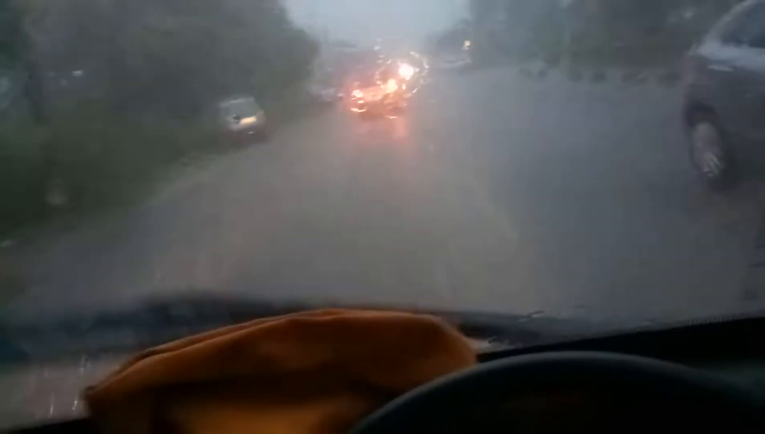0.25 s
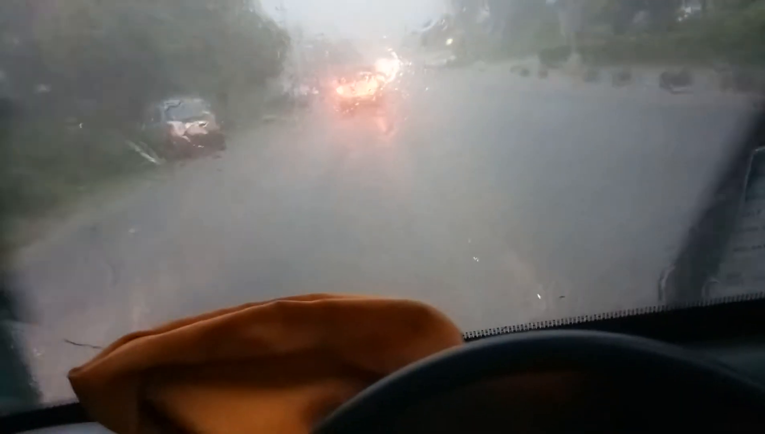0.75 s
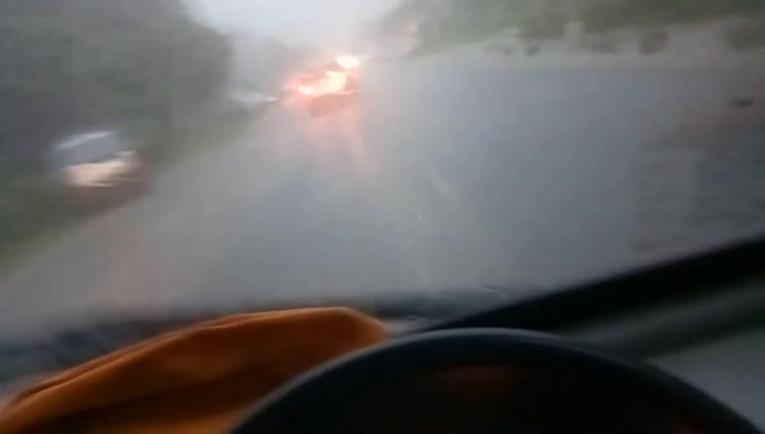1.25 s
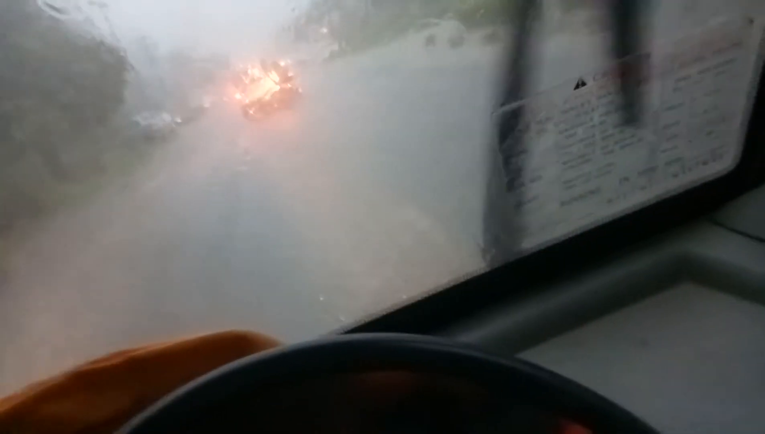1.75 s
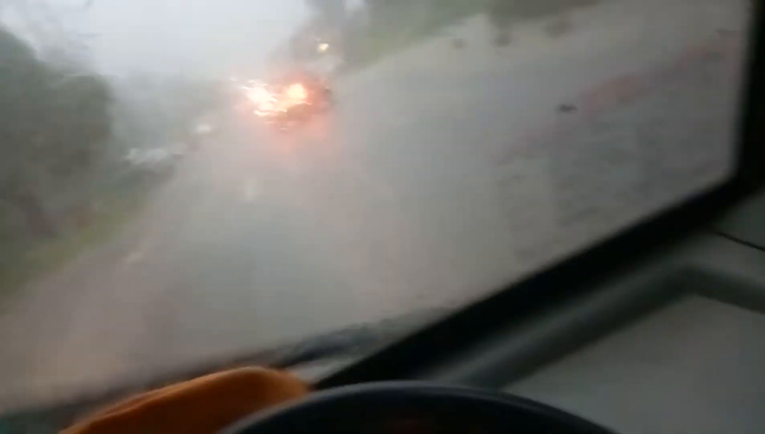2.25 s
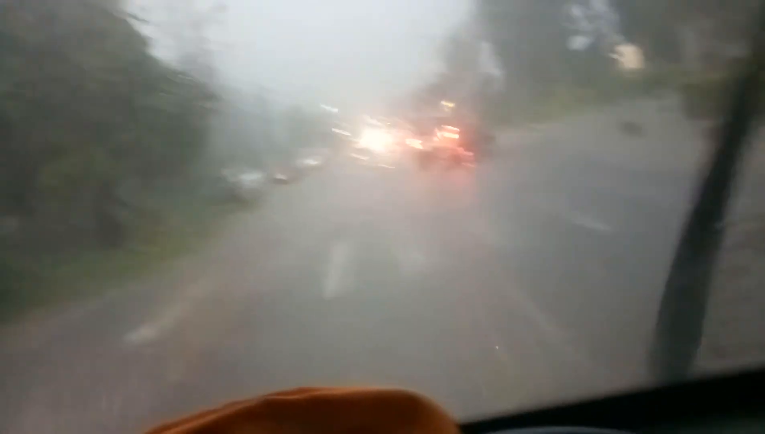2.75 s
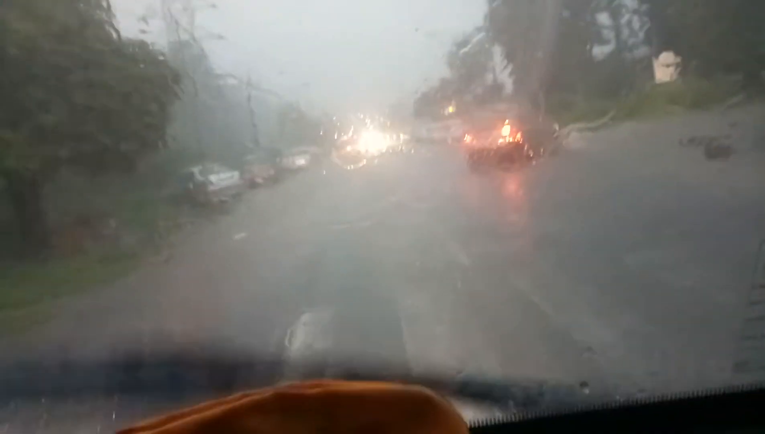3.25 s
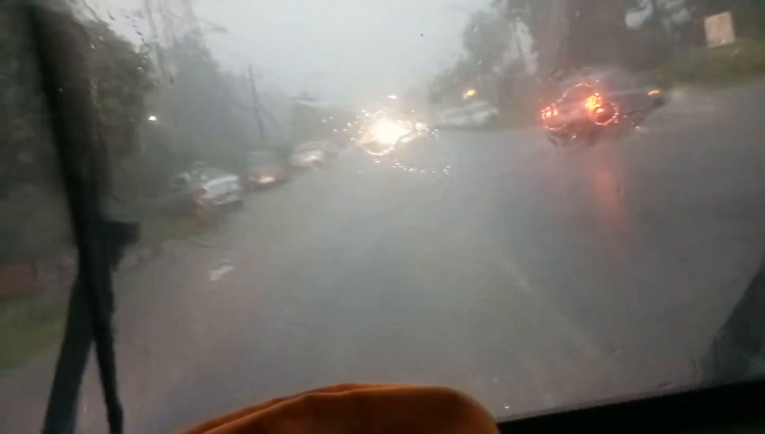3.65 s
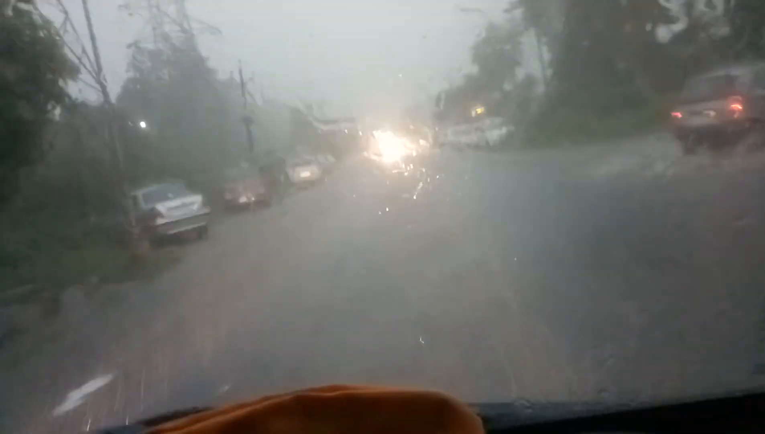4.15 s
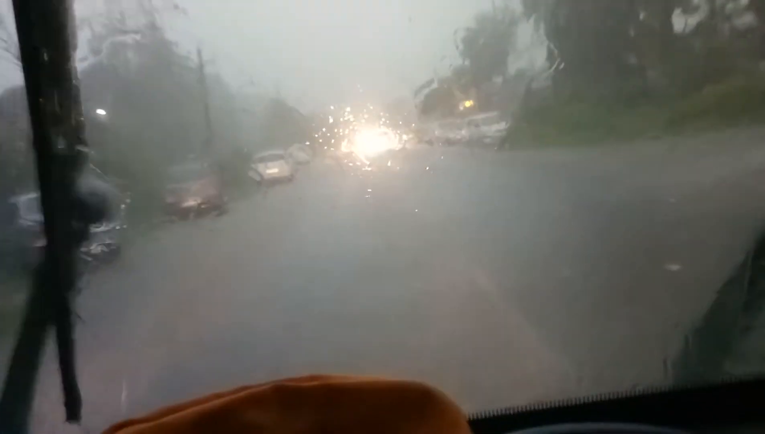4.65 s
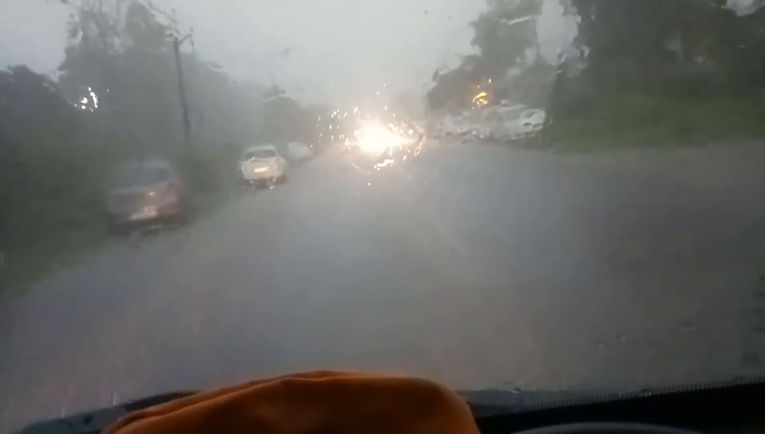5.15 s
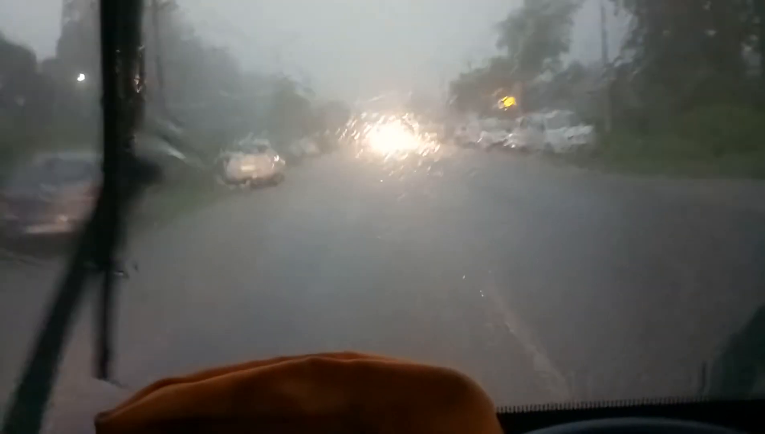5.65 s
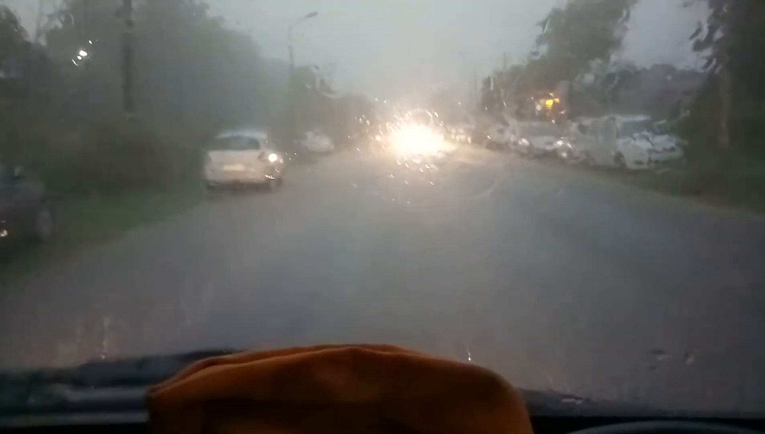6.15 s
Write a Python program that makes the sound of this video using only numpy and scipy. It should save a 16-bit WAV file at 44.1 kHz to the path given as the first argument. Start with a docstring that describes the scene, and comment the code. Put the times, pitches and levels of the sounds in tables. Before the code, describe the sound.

A microphone at the front seats catches a downpour striking a car's roof and glass, a continuous muffled hiss full of quick drops and brighter taps. Tyres rumble deeply and a few soft bumps thud through the body. The engine hums, settles into a steady cruise, then grows louder and higher, booming in the closed cabin, while the rain briefly eases before surging back to the end.

```python
"""Heavy rain on a moving car, heard inside at the front seats, with the roof and windscreen close by.
From the start a noise wash, dense patter and ringing taps of drops lie over a rumble of tyre noise.
Soft decaying thuds mark bumps from 0.2 to 4.7 s; the engine's sum of partials climbs, holds its speed to
about 3 s, then pulls hard, its partials sliding through a boom of the cabin.
The rain eases towards 5.1 s and comes back at once, lasting to the end."""
import sys
import numpy as np
from scipy import signal
from scipy.fft import rfft, irfft
from scipy.io import wavfile
from scipy.ndimage import uniform_filter1d

SR = 44100
rng = np.random.default_rng(int(sys.argv[2]) if len(sys.argv) > 2 else 0)


def to_wav(s):
    """Save 16-bit WAV."""
    ch = np.atleast_2d(s).T  # columns
    pcm = np.round(np.clip(ch, -1, 1) * 32767)  # PCM
    wavfile.write(sys.argv[1], SR, pcm.astype(np.int16))


N = 282284
TIME = np.arange(N) / SR


def gain_of(db):
    """Decibels to amplitude."""
    return 10 ** (np.asarray(db) / 20)


def evened(x):
    """Scales to rms 1."""
    return x / np.sqrt(np.mean(x ** 2) + 1e-20)


def over_hz(points, hz):
    """Reads a table on a log-frequency axis."""
    f, value = np.transpose(points)
    return np.interp(np.log(hz + 1), np.log(f + 1), value)


def over_time(points, t):
    """Reads a curve at the times t."""
    return np.interp(t, *np.transpose(points))


def drift(rate_hz):
    """Slow random wander of rms 1, up to about the given rate."""
    hz = np.fft.rfftfreq(N, 1 / SR)
    lowpass = np.exp(-(hz / rate_hz) ** 2)
    return evened(irfft(rfft(rng.standard_normal(N)) * lowpass, N))


def hump(t, middle, length):
    """A smooth rise from 0 to 1 and back."""
    return .5 + .5 * np.cos(np.pi * np.clip(2 * (t - middle) / length, -1, 1))


# tyres and body shell, as heard in the cabin: (frequency [Hz], relative level [dB])
ROAD_SPECTRUM = [(10, -24.5), (26, -17), (42, -2.5), (76, -9), (94, -1.1), (125, 0.3), (150, -3.5),
                 (200, 0.7), (228, -0.5), (262, -1), (292, -7.5), (345, -7), (378, -15.5), (480, -31),
                 (1500, -95.5)]
# rough stretches of road: (middle [s], length [s], rise in level [dB])
ROUGH_STRETCHES = [(0.3, 4.7, 1.7), (4.607, 0.65, 2), (5.8, 0.75, 2.5)]
ROAD_DB = -26  # smooth road, before the side levels


def road(apart_db=-19):
    """Tyre rumble fills the cabin, almost alike on both sides, and swells on rough stretches."""
    hz = np.fft.rfftfreq(N, 1 / SR)
    colour = gain_of(over_hz(ROAD_SPECTRUM, hz))
    common, apart = evened(irfft(rfft(rng.standard_normal((2, N))) * colour, N))
    sides = common + gain_of(apart_db) * np.array([apart, -apart])
    swell_db = sum(db * hump(TIME, middle, length) for middle, length, db in ROUGH_STRETCHES)
    return sides * gain_of(ROAD_DB + swell_db)


def thud(start, hz, rise_s, ring_s):
    """A soft rise and a short, dull decay on one pitch; ring_s is the time to fall 60 dB."""
    t = np.maximum(TIME - start, 0)
    decay = np.exp(-np.log(1000) * (t - rise_s) / ring_s)
    shape = np.minimum(t / rise_s, decay)
    return shape * np.cos(2 * np.pi * (hz * t + rng.random()))


# bumps in the road, before the side levels: (time [s], pitch [Hz], level [dB])
ROAD_BUMPS = [(0.179, 192, -20), (0.58, 123, -19), (0.995, 197, -20.5), (1.992, 108, -21),
              (2.684, 117, -19), (3.39, 211.4, -16), (4.709, 111, -19)]


def bumps(rise_s=0.0031, ring_s=0.28):
    """Each bump sets the body shell ringing."""
    return sum(gain_of(db) * thud(start, hz, rise_s, ring_s) for start, hz, db in ROAD_BUMPS)


# engine speed, levelling off and then picking up again: (time [s], four-stroke cycle rate [Hz])
ENGINE_SPEED = [(0, 14.02), (.8, 14.58), (1.85, 14.92), (2.85, 14.93), (4, 15.8), (4.5, 16.3), (5.65, 17.2),
                (6.4, 17.33)]
# throttle, a pull, cruising, a hard pull with a brief dip at 5.8 s:
# (time [s], pull [0 cruising to 1 pulling])
THROTTLE_CURVE = [(0, 0.6), (.8, 0.76), (1.1, 0.059), (1.6, 0.2), (2.2, 0.28), (2.65, .25), (3.2, 0.053),
                  (3.6, .15), (3.66, 0.78), (4.15, .83), (4.5, 0.77), (5.03, 0.92), (5.5, 0.81),
                  (5.72, .82), (5.8, 0.56), (6.0, 0.8), (6.4, 0.66)]
# engine partials, before the booms and side levels:
# (multiple of the cycle rate, level cruising [dB], level pulling [dB])
ENGINE_PARTIALS = [(2.0, -43, -52), (4.0, -44.5, -37.5), (6.0, -39, -32), (8.0, -40.5, -24.5),
                   (10.0, -46, -28), (12.0, -34.5, -34), (14.0, -46.5, -42.3), (15.0, -62, -27.5),
                   (16.0, -43.0, -30.5), (17.0, -34, -42), (18.0, -40.5, -38), (20.0, -43.5, -38),
                   (21.0, -43.5, -49)]
# how the cabin booms or swallows each pitch of the engine: (frequency [Hz], gain [dB])
CABIN_BOOMS = [(190.0, -1.5), (205.0, 4), (222.0, -6), (234.0, 5.5), (240.0, 13), (245.0, 11.9),
               (250.0, 14.5), (254.0, 12.5), (258.0, 10.5), (263.0, 3.5), (270.0, 4.1), (282.0, -8.5),
               (305.0, -3.5), (324.0, 10.5), (340.0, -5.5)]
PHASE_SPREAD = .3  # turns, times the square of the multiple


def engine(waver_db=0.27, jitter=0.00071):
    """Partials of the engine cycle, phases spread to an even hum, swell at the cabin's booms."""
    cycle_hz = over_time(ENGINE_SPEED, TIME)
    throttle = over_time(THROTTLE_CURVE, TIME)
    turns = np.cumsum(cycle_hz * (1 + jitter * drift(8.7))) / SR
    out = np.zeros(N)
    for multiple, cruising_db, pulling_db in ENGINE_PARTIALS:
        k = round(multiple)
        level_db = cruising_db + throttle * (pulling_db - cruising_db)
        level_db = level_db + waver_db * drift(6.2)
        boom_db = over_hz(CABIN_BOOMS, k * cycle_hz)
        phase = k * turns + PHASE_SPREAD * k ** 2
        out += gain_of(level_db + boom_db) * np.cos(2 * np.pi * phase)
    return out


# wet roof and glass heard through the trim: (frequency [Hz], relative level [dB])
PANEL_SPECTRUM = [(200, -7.5), (400, 1.3), (470, -4.5), (900, -3), (1350, -6.5), (1900, -3), (2800, -7),
                  (3600, -7.5), (4400, -12), (4800, -19), (5300, -25.5), (7000, -32.5), (7350, -40.5),
                  (10000, -47), (15000, -50.5)]
# broad resonances of the panels: (frequency [Hz], width [Hz], gain [dB])
PANEL_RESONANCES = [(576, 36, 7.5), (646, 47, 4), (1116, 100, 3), (2317, 480, 5.5)]
# right side against left: (frequency [Hz], level difference [dB])
RIGHT_SHADE = [(330, -6), (460, -4), (620, -2.5), (760, -8), (1250, -5), (1550, -9), (1850, -12),
               (2300, -14), (2900, -8), (3900, -3), (4900, -0.5), (7500, -3.5), (11500, 0.5),
               (14000, -10.5)]


def panel_colour(hz):
    """Gain from the struck panels to the left and right side."""
    left_db = over_hz(PANEL_SPECTRUM, hz)
    for f, width, db in PANEL_RESONANCES:
        left_db = left_db + db / (1 + (2 * (hz - f) / width) ** 2)
    return gain_of([left_db, left_db + over_hz(RIGHT_SHADE, hz)])


# likeness of the rain wash on both sides: (frequency [Hz], correlation [-1 to 1])
SIDE_LIKENESS = [(350, -0.33), (470, 0.0056), (560, 0.95), (680, .72), (800, -.05), (1080, 0.63),
                 (1350, -0.34), (1800, 0.0027), (2350, 0.3), (2950, -0.35), (4800, 0.29), (6000, 0)]
WASH_DB = -27  # before the downpour's rise and fall


def wash(patchy_db=1.05, flicker_db=1.05):
    """Countless small drops blur into a wash of noise that comes in patches and quick flurries."""
    frames, hz = N // 256 + 5, np.fft.rfftfreq(1024, 1 / SR)
    a, b, c, d, patches = rng.standard_normal((frames, len(hz), 5)).T
    # patches are smoothed over pitch, then over time; flurries strike all pitches together
    patches = uniform_filter1d(patches, size=18, axis=0)
    patches = evened(uniform_filter1d(patches, size=9, axis=1))
    flurries = evened(uniform_filter1d(rng.standard_normal(frames), size=6))
    same = np.clip(over_hz(SIDE_LIKENESS, hz), -1, 1)[:, None]
    left = a + 1j * b
    right = same * left + np.sqrt(1 - same ** 2) * (c + 1j * d)
    z = np.array([left, right]) * panel_colour(hz)[:, :, None]
    z *= gain_of(patchy_db * patches + flicker_db * flurries)
    return gain_of(WASH_DB) * evened(signal.istft(z, nperseg=1024, noverlap=768)[1][:, :N])


def drops(per_s, spread_db, largest, ring_s, width_hz, low_hz=800):
    """Drops strike spots of roof and glass; each spot has a short, dense ring around its own pitch."""
    count = 24  # spots
    t, hz = np.arange(2048) / SR, np.fft.rfftfreq(N, 1 / SR)
    size_db = spread_db * np.minimum(rng.exponential(1, N), largest)
    hits = gain_of(size_db) * (rng.random(N) < per_s / SR)
    spot = rng.integers(0, count, N)
    spot_hz = np.linspace(1090, 4600, count)[:, None, None]
    off_hz = np.fft.rfftfreq(len(t), 1 / SR) - spot_hz
    noise = rng.standard_normal((count, 2, len(t)))
    rings = irfft(rfft(noise) / (1 + (2 * off_hz / width_hz) ** 2))
    rings = rings * np.exp(-np.log(1000) * t / ring_s)  # down 60 dB after ring_s
    struck = np.zeros((2, N))
    for k, ring in enumerate(rings):
        struck += signal.oaconvolve((hits * (spot == k))[None], ring, axes=1)[:, :N]
    # a single drop moves little air at low pitch
    colour = panel_colour(hz) * hz ** 2 / (hz ** 2 + low_hz ** 2)
    return evened(irfft(rfft(struck) * colour, N))


# levels of the rain in three bands; the downpour surges, eases slowly and comes back at once; apart from that,
# the treble stands higher from about 1.4 to 2.4 s: (time [s], level of the mids [dB], level of the upper mids
# [dB], level of the treble [dB])
DOWNPOUR_LEVELS = [(0.0, -0.5, 0.7, -0.5), (0.18, -1, 0.5, -1.6), (0.33, 0.5, -0.8, -1.5),
                   (0.45, 1.2, 0.5, -0.2), (0.68, 0.3, 0.1, 0.5), (0.8, -0.1, -1.6, -2),
                   (1.18, -2, -2.2, -1.5), (1.42, 1.1, 1.2, 1.9), (1.49, 0, -1, 0.5), (1.56, -1, 0, 1.5),
                   (1.7, 1.5, 2.5, 1.7), (1.8, 1, 2.5, 2), (2.0, 1.0, 0.5, 0.9), (2.17, 1.5, 0.3, 2.6),
                   (2.28, -1, 0.7, -0.2), (2.42, 1.8, 1, 2.8), (2.65, -1, 0, 0.2), (2.77, -0.8, -1.5, -1.5),
                   (2.86, 1, 0, 1.3), (3.08, 1, 1.5, 1), (3.27, 0.8, -1.3, 0), (3.46, 1, 1.2, 0.2),
                   (3.58, 0.7, 2.0, 0.9), (3.68, -1, -1.5, -2.1), (3.86, -0.6, 0.1, -1.5),
                   (4.05, -0.5, -1, -1.2), (4.38, -1, -0.5, -1.2), (4.6, -1.5, 0, -1.2),
                   (4.8, -1.5, -2.6, -1.5), (4.95, -2.5, -3, -2.8), (5.08, -3.5, -2.5, -3.5),
                   (5.2, 0.7, 1.2, 0.7), (5.35, -0.8, -0.3, -0.8), (5.48, 0.5, 3.5, 0.7),
                   (5.6, 0.9, 1, 0.8), (5.85, 0.7, 0.7, 1), (6.05, 0.3, 1.5, 1.1), (6.22, 1.5, 2.9, 1.5),
                   (6.4, 0.2, 1.7, 2.2)]
# where those levels hold, blending in between:
# (frequency [Hz], band [0 mids, 1 upper mids, 2 treble])
DOWNPOUR_BANDS = [(1500, 0), (2000, 1), (2550, 1), (3000, 2)]


def downpour(hz, t):
    """Rise and fall of the rain in dB at the pitches hz and times t."""
    when, *levels = np.transpose(DOWNPOUR_LEVELS)
    band = over_hz(DOWNPOUR_BANDS, hz)
    db = 0
    for k, level in enumerate(levels):
        share = np.maximum(1 - abs(band - k), 0)
        db = db + np.outer(share, np.interp(t, when, level))
    return db


PATTER_DB, PATTER_PER_S = -29, 1400  # level before the downpour's rise and fall, drops a second
TAPS_DB, TAPS_PER_S = -33.5, 180


def rain():
    """Wash, dense patter on the roof and separate taps on the windscreen follow the downpour."""
    patter = drops(PATTER_PER_S, spread_db=2.5, largest=2.8, ring_s=0.022, width_hz=12000)
    taps = drops(TAPS_PER_S, spread_db=2.5, largest=2.2, ring_s=0.063, width_hz=1500)
    steady = wash() + gain_of(PATTER_DB) * patter + gain_of(TAPS_DB) * taps
    hz, t, z = signal.stft(steady, SR, nperseg=1024)
    return signal.istft(z * gain_of(downpour(hz, t)), SR, nperseg=1024)[1][:, :N]


def scene(left_db=4.5, right_db=-2.5):
    """Engine, road and bumps are stronger on the left; the rain joins on both sides."""
    driving = (road() + bumps() + engine()) * gain_of([[left_db], [right_db]])
    return driving + rain()


EDGE_HZ = 15150  # upper band limit


def record(dry):
    """A brief fade at both ends, then the band limit of the recorder."""
    from_end_s = np.minimum(TIME, TIME[::-1])
    fade = np.sin(np.pi / 2 * np.minimum(from_end_s / .003, 1)) ** 2
    lowpass = signal.firwin(511, EDGE_HZ, window=("kaiser", 9), fs=SR)
    return signal.oaconvolve(dry * fade, lowpass[None], "same")


dry = scene()
out = record(dry)
to_wav(out)
```